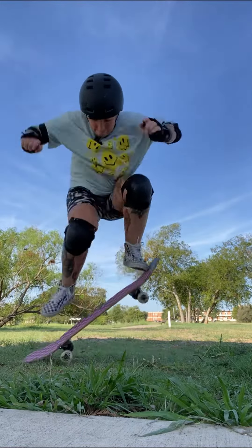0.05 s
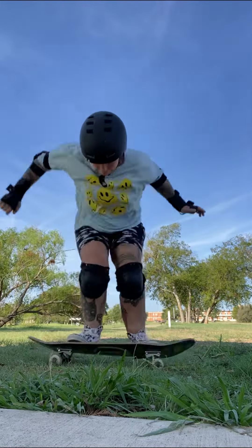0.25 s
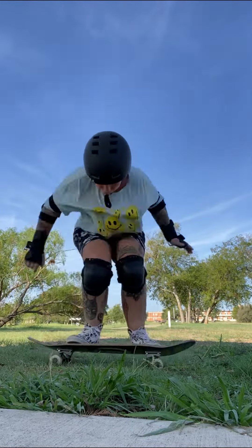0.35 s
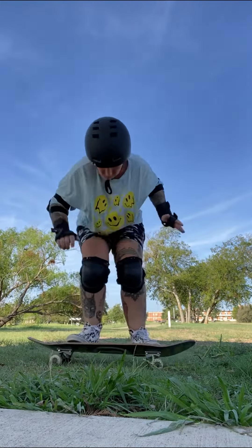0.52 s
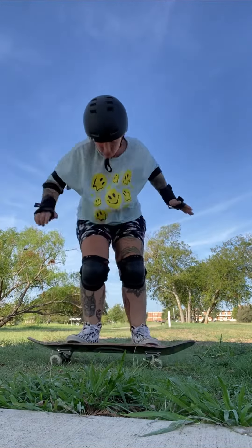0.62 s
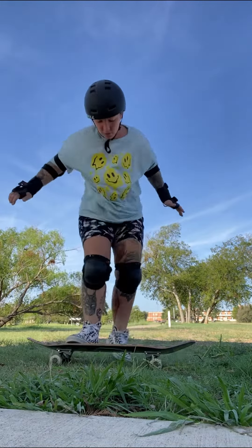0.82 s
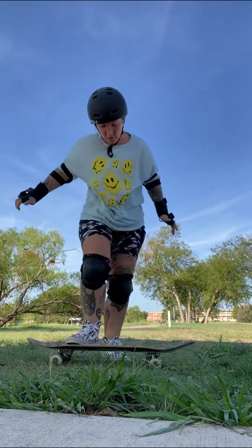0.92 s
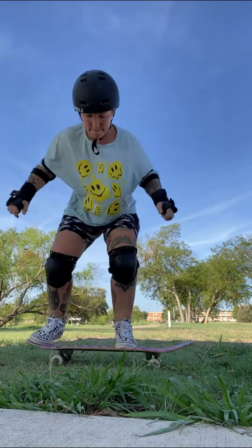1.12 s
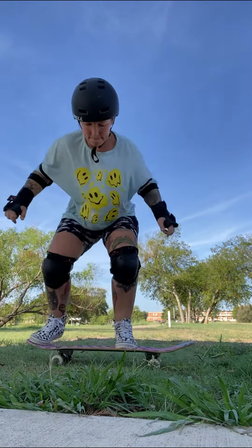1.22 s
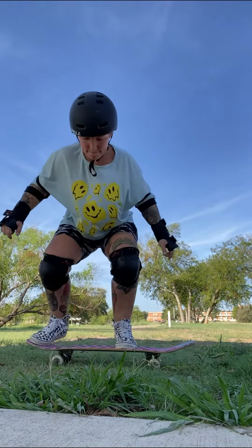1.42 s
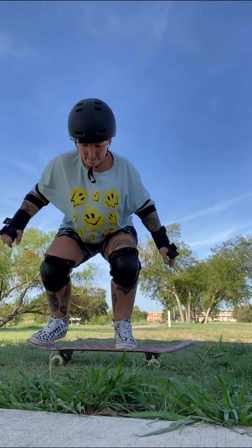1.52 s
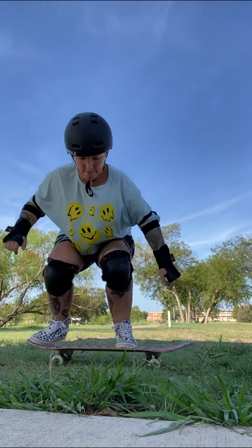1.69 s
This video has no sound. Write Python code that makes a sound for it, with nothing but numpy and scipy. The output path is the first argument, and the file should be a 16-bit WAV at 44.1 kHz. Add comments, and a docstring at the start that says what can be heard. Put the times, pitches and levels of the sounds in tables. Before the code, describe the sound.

Close stereo microphone near the ground: rubber soles scuff grip tape, the loaded deck thumps down, light ticks follow, then hard wooden knocks cluster and scatter briefly over an open park with a faint low drone.

```python
"""Park grass, a skateboard jump close to a pair of microphone ports on the ground.
Shoes scuff the grip tape (gated noise), the deck lands (struck modes) and the wheels thud into the turf.
Harder wooden cracks and a rattling slam follow (noise bursts and ringing modes) and fade over the park
as diffuse scatter. Behind them: open air, a low distant drone (fluttering sines), a soft rolling rush
(shaped noise) and, near the end, a thin hiss like insects (narrow noise bands)."""
import sys
import numpy as np
from scipy import signal
from scipy.fft import rfft, irfft
from scipy.io import wavfile
from scipy.ndimage import uniform_filter1d

SR = 44100
rng = np.random.default_rng(int(sys.argv[2]) if len(sys.argv) > 2 else 0)


def wrap_up_sound(samples):
    """Save the sound to the file named by the first command line argument, as 16-bit audio."""
    columns = np.atleast_2d(samples).T
    # keep every value between -1 and 1, then stretch to whole-number steps
    tamed = np.clip(columns, -1, 1)
    steps = np.round(tamed * 32767).astype(np.int16)
    wavfile.write(sys.argv[1], SR, steps)


N = 77175
T = np.arange(N) / SR
FREQS = np.fft.rfftfreq(2 * N, 1 / SR) + 1e-3  # just above zero, so that its logarithm exists

# blows of the landing on the deck: t/s, level/dB, brightness f/Hz
LANDING_BLOWS = [(0.203, -20, 2020), (.208, -8, 790), (0.2143, -18.5, 2130), (0.223, -15, 600)]
# modes of the deck under the rider's feet: f/Hz, level/dB, t60/s
LOADED_DECK = [(253, -24, 0.29), (363, -10.5, 0.039), (463.5, -7, 0.091), (544, -5.5, 0.033),
               (621, 5, 0.051), (665, 3, 0.043), (1059, 3, 0.072), (1679, 4.5, 0.024), (1737, 1, 0.047)]
CRUNCH_DB, CRUNCH_DECAY_S = 6, 0.0051  # level relative to each blow
# wheels sinking into the turf: t/s, level/dB
WHEEL_BLOWS = [(0.2183, -9), (0.2303, -31)]
# modes of the turf thud: f/Hz, level/dB, t60/s
TURF_MODES = [(76.6, -9.5, 0.19), (141, 2, 0.086)]
# shoes scuffing the grip tape: t/s, length/s, level/dB
SCUFFS = [(0.001, 0.016, -31.5), (0.024, 0.02, -40), (0.089, 0.008, -47), (0.1027, 0.0083, -30.5),
          (0.151, 0.0099, -28), (0.174, 0.013, -38.5), (0.199, 0.01, -15), (0.238, 0.0041, -31.5)]
# colour of the grip tape: f/Hz, level/dB
GRIP_COLOUR = [(130, -4.5), (390, -5.5), (510, 5.5), (800, 0), (1900, -5.5), (2800, -26.5), (5000, -23.5),
               (8500, -21.5), (14000, -24)]

# hard knocks: t/s, ring level/dB, crack level/dB, crack decay/s, brightness f/Hz, low cut f/Hz,
# pitch of the snap/ratio
KNOCKS = [(.6031, -39, -10.5, 0.005, 3000, 208, 0.926), (.6052, -34.5, -5.5, 0.0026, 4200, 254, 1.02),
          (0.8565, -30, -14.5, 0.0028, 2470, 101, 0.95), (.858, -28.5, -10, 0.0026, 2100, 378, 0.85),
          (0.9046, -21.5, -9, 0.005, 5050, 328, 1.1), (.9075, -10, -12.5, 0.004, 3620, 146.3, .86),
          (.922, -21.5, -20, 0.013, 3570, 102.5, 1.7), (.928, -19, -22, 0.01, 4800, 92.3, 1),
          (.940, -32.5, -23.5, 0.0024, 1760, 99, 0.67), (.9565, -19.5, -41, 0.0055, 990, 775, 1),
          (1.059, -43, -51, 0.0046, 1500, 680, 1.4)]
# modes of the freely ringing deck and trucks: f/Hz, level/dB, t60/s
FREE_DECK = [(101, -0.5, 0.093), (152, -1.5, 0.051), (268, -11, 0.27), (294, -13.5, 0.09), (464.3, 0, 0.2),
             (559.7, 5, 0.084), (642.8, -7.5, 0.15), (745, -0.5, 0.056), (839, -7.5, 0.15),
             (871, -8.5, 0.14), (974, -14.5, 0.1), (1136, -5, 0.036), (1220, -14, 0.1),
             (1286, -14.5, 0.063)]
# colour of the crack: f/Hz, level/dB
CRACK_COLOUR = [(90, -16.5), (230, 11), (500, -2), (1200, 3.5), (1600, -2), (2300, 1), (3300, -4.5),
                (3800, -26), (4600, -11), (5400, -12), (8000, -20.5), (13000, -23)]
CONTACT_RISE_S = 0.00028
# short, bright modes of the crack, before each knock's pitch ratio: f/Hz, level/dB, t60/s
SNAP_MODES = [(260, -13.5, 0.17), (667, -17, 0.068), (840, -13, 0.029), (1094, -21, 0.016),
              (1180, -12, 0.032), (1410, -3.5, 0.034), (1585, -4, 0.025), (1920, -19.5, 0.013),
              (2288, -2, 0.031), (2730, -22, 0.011), (3116, 4, 0.013), (4580, -3.5, 0.021),
              (7340, -22, 0.0033), (12100, 7, 0.0047)]
SNAP_DB = -7.5  # relative to the crack
SPOT_DETUNE, SPOT_DB = .025, 1.5  # spread of the snap modes with the spot struck: share of f, dB
# lighter taps and ticks of the deck and trucks: t/s, level/dB, centre f/Hz, decay/s
TICKS = [(0.013, -27, 4960, 0.0012), (0.213, -18, 11600, 0.00084), (0.227, -35.5, 2640, 0.027),
         (0.3789, -30, 5200, 0.00083), (0.4479, -29, 3600, 0.0012), (0.4689, -36, 1380, 0.0085),
         (0.486, -35.5, 260, 0.022), (0.576, -36.5, 219, 0.064), (0.686, -29.5, 1360, 0.0057),
         (.86, -32, 110, 0.019), (0.868, -21.5, 1110, 0.0057), (0.886, -20.5, 950, 0.0068),
         (.912, -31.5, 13000, 0.019), (0.9565, -26, 870, 0.0066), (1.059, -28.5, 960, 0.0054),
         (1.058, -45.5, 5500, 0.0077), (1.166, -54.5, 3520, 0.053), (1.229, -50.5, 3400, 0.0059)]

# colour of the park's echo: f/Hz, level/dB
ECHO_COLOUR = [(100, -20.5), (300, 2.5), (700, -7), (1500, -3), (2800, -1.5), (5000, -3), (9000, 1.5),
               (14000, -41)]
# edges of the echo bands: f/Hz
ECHO_EDGES = [100, 350, 800, 1600, 2600, 3800, 5500, 9500, 15000]
NEAR_ECHO_DB, NEAR_T60_S, FAR_ECHO_DB, FAR_T60_S, ECHO_DELAY_S = -11, 0.24, -26, 1, 0.0059
LANDING_ECHO_DB = -5  # landing and scuffs into the echo, relative to the knocks

# colour of the open air: f/Hz, relative level per Hz/dB
AIR_COLOUR = [(15, -51), (25, -28), (49, -5), (81, -11.5), (118, -13), (264, -20.5), (326, -29),
              (363, -26.5), (1210, -35), (1540, -35.5), (2430, -48), (3930, -50.5), (15000, -70.5)]
AIR_DB, AIR_SIDE = -46.5, 0.34
# lines of the distant drone, about which they flutter: f/Hz, level/dB
DRONE_LINES = [(57, -49.5), (113, -42), (178, -54.5)]
STRENGTH_FLUTTER, PITCH_FLUTTER = 0.5, 0.06  # spread as a share of the drone's amplitude and frequency
# course of the soft rolling rush, before its flutter: t/s, level/dB
RUSH_COURSE = [(0, -46), (.3, -47), (.45, -48), (.54, -53.5), (.72, -43), (.85, -47), (1.02, -45.5),
               (1.08, -63), (1.3, -66.5), (1.75, -86)]
# colour of the rush: f/Hz, level/dB
RUSH_COLOUR = [(120, 6), (450, 0), (1200, -5), (3200, -12), (5500, -21.5), (8500, -24.5), (14000, -41)]
RUSH_FLUTTER_DB = 1.5
# narrow bands in which the insects sing: f/Hz, width/Hz, level/dB
INSECT_BANDS = [(2990, 130, -62), (3220, 60, -68), (3520, 110, -63), (3860, 60, -71), (4600, 50, -74),
                (4900, 70, -74)]
# colour of the hiss around them: f/Hz, level/dB
HISS_COLOUR = [(800, -1), (1190, 5.5), (1300, -12), (2500, -2.5), (3300, -1), (4300, -8), (8000, -17.5),
               (13000, -37)]
HISS_START_S, HISS_RISE_S, HISS_DB = 1.406, 0.035, -54

# microphone pair, left minus right for the landing: f/Hz, level/dB
LANDING_BALANCE = [(100, 2), (450, 3.5), (700, 2.3), (1200, 5.8), (2000, 1.2), (8000, 0.9)]
# the same for the landing's phase: f/Hz, phase/rad
LANDING_PHASE = [(100, 0.15), (650, 0.62), (900, 1.57), (2000, 1.4), (4000, 2.2), (12000, 1.42)]
# left minus right for the knocks: f/Hz, level/dB
KNOCK_BALANCE = [(100, 2.5), (350, 2), (900, 2), (1600, 2.5), (2500, 1.5), (4500, -5.5), (6000, 3.5),
                 (8000, -4.5), (14000, 1.5)]
# the same for the knocks' phase: f/Hz, phase/rad
KNOCK_PHASE = [(100, -1), (400, 0.9), (1000, -0.78), (3000, -1.44), (4600, -2), (5600, -2.5), (7500, 0),
               (13000, -3)]
CEILING = .8  # full scale = 1
LOW_CUT_HZ, TOP_HZ = 38, 14600
NOTCH_HZ, NOTCH_WIDTH_HZ, NOTCH_DB = 10460, 760, -16
DIP_S, DIP_DECAY_S, DIP_DB = 1.0335, 0.0092, -28


def landing():
    """The loaded deck takes several quick blows, and the wheels thud into the turf."""
    force, crunch = 0, 0
    for start, db, hz in LANDING_BLOWS:
        force = force + soften(push(start, db), hz)
        grit = noise(GRIP_COLOUR) * undb(db + CRUNCH_DB) * burst(start, CRUNCH_DECAY_S, CONTACT_RISE_S)
        crunch = crunch + soften(grit, hz)
    wheels = sum(push(start, db) for start, db in WHEEL_BLOWS)
    thud = ring(soften(wheels, hz=306), TURF_MODES)
    return ring(force, LOADED_DECK) + crunch + thud


def scuffs():
    """Gritty strokes of rubber soles on grip tape: pressure gates a roughly flickering noise."""
    pressure = sum(undb(db) * burst(start, 0.011, 0.0013, hold=length) for start, length, db in SCUFFS)
    grit = unit(noise(GRIP_COLOUR) * undb(2.8 * walk(600)))
    return pressure * grit


def knocks():
    """Each hard contact cracks, snaps and sets the deck ringing; glancing ones have little bass."""
    force, cracks = 0, 0
    for start, ring_db, crack_db, decay, hz, low_hz, pitch in KNOCKS:
        force = force + thin(soften(push(start, ring_db), hz), low_hz)
        grit = noise(CRACK_COLOUR) * undb(crack_db) * burst(start, decay, CONTACT_RISE_S)
        snap = ring(push(start, crack_db + SNAP_DB), struck(SNAP_MODES, pitch))
        crack = grit + soften(snap, hz=6250)
        # the crack reaches an octave higher than the force on the deck
        cracks = cracks + thin(soften(crack, hz * 2), low_hz)
    return ring(force, FREE_DECK) + cracks


def struck(modes, pitch):
    """The modes as one blow excites them: every spot on the deck sounds a little different."""
    chance = rng.standard_normal((len(modes), 2))
    return [(hz * pitch * (1 + SPOT_DETUNE * a), db + SPOT_DB * b, t60)
            for (hz, db, t60), (a, b) in zip(modes, chance)]


def ticks():
    """Light taps and rattles: short noise bursts, each peaked at its own centre frequency."""
    out = 0
    for start, db, hz, decay in TICKS:
        colour = [(hz / 10, -42), (hz / 2, -12), (hz, 0), (hz * 2, -14), (hz * 50, -75)]
        out = out + undb(db) * burst(start, decay, CONTACT_RISE_S) * noise(colour)
    return out


def echo(x):
    """Diffuse scatter: in each band the energy fades fast from near surfaces, slowly from the trees."""
    fade, out = 0, 0
    for db, t60 in [(NEAR_ECHO_DB, NEAR_T60_S), (FAR_ECHO_DB, FAR_T60_S)]:
        tail = burst(ECHO_DELAY_S, t60 / np.log(1000), 0.0018)
        fade = fade + undb(db) * tail / np.linalg.norm(tail)
    scatter = wide([(20, 0), (20000, 0)], side=0.7)
    source = shape(x, curve(ECHO_COLOUR))
    for low, high in zip(ECHO_EDGES, ECHO_EDGES[1:]):
        band = 1 / np.sqrt((1 + (low / FREQS) ** 16) * (1 + (FREQS / high) ** 16))
        energy = signal.fftconvolve(shape(source, band) ** 2, fade ** 2)[:N]
        out = out + np.sqrt(np.abs(energy)) * unit(shape(scatter, band ** 2))
    return out


def park():
    """Open air and drone, a little stronger on the left, with the rush and the insects."""
    air = undb(AIR_DB) * wide(AIR_COLOUR, side=AIR_SIDE)
    lean = undb(np.array([[.8], [-.8]]))
    return (air + drone()) * lean + rush() + insects()


def drone():
    """Low distant sines whose strength and pitch flutter quickly and irregularly."""
    out = 0
    for hz, db in DRONE_LINES:
        strength = undb(db) * (1 + STRENGTH_FLUTTER * walk(29.97))
        pitch = hz * (1 + PITCH_FLUTTER * walk(29.72))
        out = out + strength * np.sin(2 * np.pi * np.cumsum(pitch) / SR)
    return out


def rush():
    """A soft rolling rush: wide noise that swells and sinks with a slight flutter."""
    level_db = np.interp(T, *np.array(RUSH_COURSE).T) + RUSH_FLUTTER_DB * walk(60.75)
    return undb(level_db) * wide(RUSH_COLOUR, side=0.42)


def insects():
    """A distant chorus: steady narrow bands over a thin hiss, coming in near the end."""
    bands = 0
    for hz, width, db in INSECT_BANDS:
        resonance = 1 / (1 + (2 * (FREQS - hz) / width) ** 2)
        bands = bands + undb(db) * unit(shape(rng.standard_normal(N), resonance))
    hiss = undb(HISS_DB) * wide(HISS_COLOUR, side=0.43)
    return np.clip((T - HISS_START_S) / HISS_RISE_S, 0, 1) * (bands + hiss)


def undb(db):
    """Decibels to gain."""
    return 10 ** (np.asarray(db) / 20)


def unit(x):
    """Scale to rms 1."""
    return x / np.sqrt(np.mean(x ** 2))


def curve(points):
    """Gain per frequency from (f/Hz, level/dB) points, joined along log frequency."""
    hz, db = np.array(points).T
    return undb(np.interp(np.log(FREQS), np.log(hz), db))


def shape(x, response):
    """Filter by a frequency response."""
    return irfft(rfft(x, 2 * N) * response)[..., :N]


def noise(points):
    """Coloured noise of rms 1."""
    return unit(shape(rng.standard_normal(N), curve(points)))


def wide(points, side):
    """Stereo noise: alike in the bass, wider in the treble."""
    spread = shape(noise(points), np.clip(side * np.sqrt(FREQS / 500), 0, 1))
    return noise(points) + np.array([spread, -spread])


def soften(x, hz):
    """A softer contact loses its treble."""
    return signal.sosfilt(signal.butter(2, min(hz, SR / 3), fs=SR, output="sos"), x + 1e-18)


def thin(x, hz):
    """Take away the bass."""
    return signal.sosfilt(signal.butter(3, hz, "high", fs=SR, output="sos"), x + 1e-18)


def burst(start, decay, rise, hold=0):
    """Attack, hold and exponential release, all in seconds."""
    age = np.maximum(T - start, 0)
    return (1 - np.exp(-age / rise)) * np.exp(-np.maximum(age - hold, 0) / decay)


def push(start, db):
    """One sharp blow: a single-sample impulse."""
    return undb(db) * signal.unit_impulse(N, int(np.clip(start * SR, 0, N - 1)))


def ring(force, modes):
    """Damped modes driven by a force; all have died within half a second."""
    age = T[T < .5]
    body = sum(undb(db - 60 * age / t60) * np.cos(2 * np.pi * hz * age) for hz, db, t60 in modes)
    return signal.fftconvolve(force, body)[:N]


def walk(rate):
    """Random flutter of rms 1: held random steps, rate per second, smoothed twice."""
    k = int(SR / rate)
    steps = np.repeat(rng.standard_normal(N // k + 2), k)
    return unit(uniform_filter1d(uniform_filter1d(steps, k), k)[:N])


def ports(x, balance, phase):
    """A source as the two microphone ports hear it, level and phase split evenly between them."""
    hz, radians = np.array(phase).T
    angle = np.interp(np.log(FREQS), np.log(hz), radians)
    half = np.sqrt(curve(balance)) * np.exp(.5j * angle)
    return np.array([shape(x, half), shape(x, 1 / half)])


def scene():
    """Landing and hard knocks close by, each with its own stereo balance and phase, then the park."""
    near = landing() + scuffs()
    hard = knocks() + ticks()
    direct = ports(near, LANDING_BALANCE, LANDING_PHASE) + ports(hard, KNOCK_BALANCE, KNOCK_PHASE)
    return direct + echo(hard + undb(LANDING_ECHO_DB) * near) + park()


def record(dry):
    """The microphone rounds peaks, loses deep bass and top treble, has a notch; the level dips once."""
    rounded = dry / (1 + (dry / CEILING) ** 6) ** (1 / 6)
    lean = thin(thin(rounded, LOW_CUT_HZ), LOW_CUT_HZ)
    notch = undb(NOTCH_DB * np.exp(-((FREQS - NOTCH_HZ) / NOTCH_WIDTH_HZ) ** 2))
    # the level dips briefly after the slam
    dip = undb(DIP_DB * burst(DIP_S, DIP_DECAY_S, 0.00046, hold=0.0028))
    top_cut = signal.ellip(8, .2, 70, TOP_HZ, fs=SR, output="sos")
    return signal.sosfilt(top_cut, shape(lean, notch) * dip)


dry = scene()
out = record(dry)
wrap_up_sound(out)
```